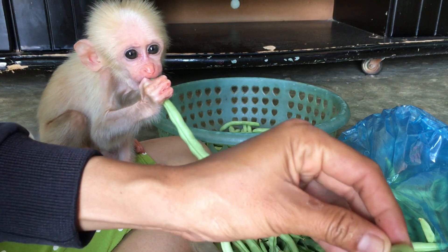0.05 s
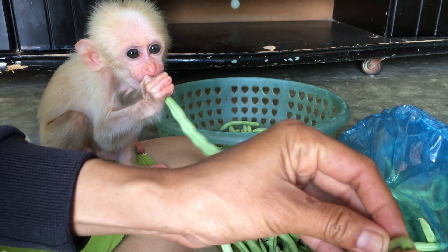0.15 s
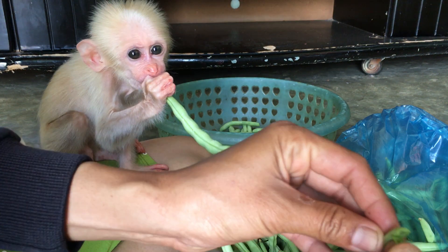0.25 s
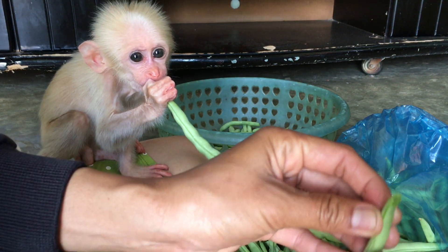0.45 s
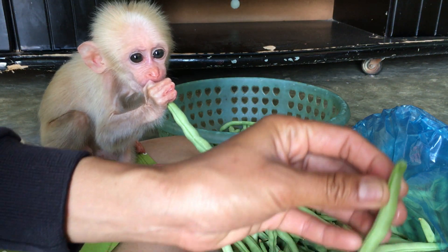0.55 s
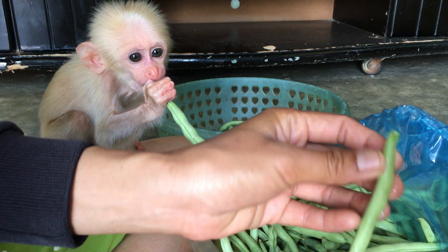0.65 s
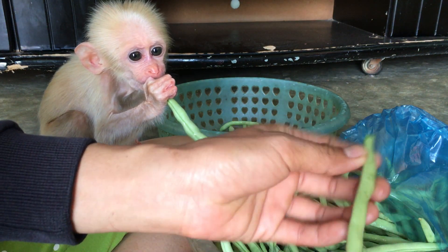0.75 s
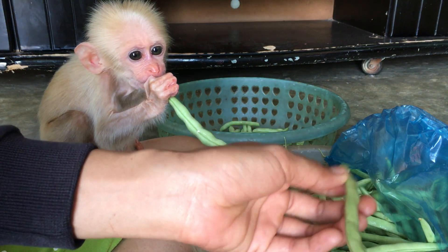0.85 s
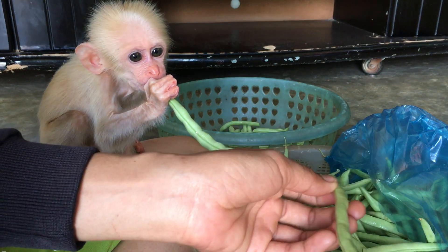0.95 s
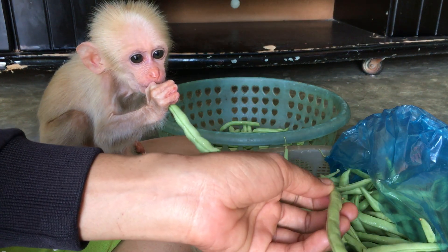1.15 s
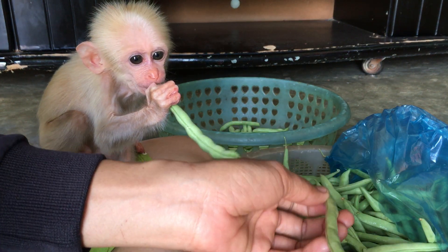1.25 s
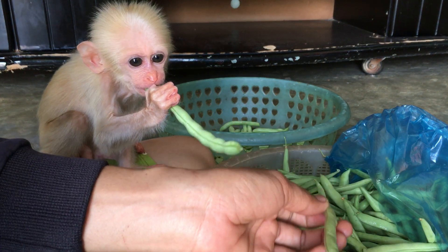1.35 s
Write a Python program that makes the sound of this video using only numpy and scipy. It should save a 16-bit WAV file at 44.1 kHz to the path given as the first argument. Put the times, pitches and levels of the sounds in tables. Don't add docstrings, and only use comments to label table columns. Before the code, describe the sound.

A green bean snaps once at about 0.22 seconds, very loud, dry and bright, close to the microphone. Before it, quiet room air, a faint low motor drone and tiny fibre ticks from 0.19. Sharp reflections follow at 0.25 to 0.27, and a thin room tail fades over half a second. Faint finger ticks come near 0.46, 0.78, 0.89 and 1.1, with barely audible bean and skin rustles.

```python
import sys
import numpy as np
from scipy import signal
from scipy.fft import rfft, irfft
from scipy.io import wavfile

SR = 44100
rng = np.random.default_rng(int(sys.argv[2]) if len(sys.argv) > 2 else 0)


def dump_mix(stems):
    frames = np.atleast_2d(stems).T
    limited = np.clip(frames, -1, 1)
    pcm = np.round(limited * 32767).astype(np.int16)
    wavfile.write(sys.argv[1], SR, pcm)


def ratio(d):
    e = np.asarray(d, float) / 20
    return 10 ** e


N = 61739

# f/Hz, density/dB per Hz
AIR_SPECTRUM = [(30, -9), (130, -4.5), (245, -11.5), (420, -18.5), (600, -24), (1200, -23.5), (5000, -35.5),
                (16000, -44.5)]
AIR_DB = -63
# t/s, f/Hz, level/dB
MOTOR_DRONE = [
    (0, 99.9, -70),
    (0.221, 91.9, -64),
    (0.578, 90.04, -63),
    (.66, 118.4, -64.5),
    (.95, 120, -65),
    (1.05, 124.9, -72),
    (1.201, 140.8, -64),
    (1.4, 135.5, -69),
]
DRONE_SWELL_DB, DRONE_WAVER_HZ = 2.2, 2
HUM_HZ, HUM_DB = 48, -69.5

# t/s, length/s, level/dB, centre f/Hz,
# width/octaves
RUSTLES = [(0.024, 0.061, -71.5, 1130, .2), (0.067, .2, -70, 350, .3),
           (0.935, 0.088, -77.5, 2870, 0.83), (1.112, 0.034, -73, 1270, 1.4),
           (1.33, 0.1, -74.5, 1580, .6), (.52, 0.13, -75.5, 3000, 1.1), (0.52, 0.23, -85.5, 9080, .15),
           (.58, 0.074, -83.5, 6610, 0.3), (1.29, 0.19, -72, 260, 0.17), (1.182, 0.095, -68, 99, 0.22),
           (0.97, 0.042, -70.5, 238, 0.28), (1.243, 0.002, -74, 5500, 1.43),
           (.86, 0.0094, -79, 11800, .6),
           (.5, .04, -78, 12500, .3),
    (.6, .04, -81, 11500, .5),
    (.41, .04, -84, 14000, .3),
    (.8, .06, -86, 12500, .4),
    (.925, .015, -81, 12500, .5),
    (.51, .02, -67, 150, .1),
]

# t/s, level/dB, low f/Hz, high f/Hz, length/s
TICKS = [(0.1935, -46, 2950, 14000, 0.00018), (.2053, -51, 2520, 14100, .00015),
         (0.2114, -50, 5070, 15500, 0.00044), (0.2138, -51, 4000, 14800, .0008),
         (.2248, -24.5, 4040, 10100, 0.00038), (0.2528, -26, 2870, 7800, 0.00021),
         (.2530, -32, 9800, 14700, 0.00052), (.2668, -30, 8000, 13900, 0.00044),
         (0.457, -49, 5500, 9500, .0006), (0.477, -58.5, 8500, 9500, 0.0066),
         (0.556, -59, 4950, 14100, 0.0076), (0.7174, -61, 12500, 15760, 0.0016),
         (0.7744, -57.5, 1504, 2080, .001), (.7751, -51.5, 3180, 6500, 0.00063),
         (.7752, -59, 7070, 13060, 0.0012), (0.878, -58, 7930, 13000, 0.0018),
         (.889, -53.5, 2540, 3600, 0.0017), (0.8893, -55, 5000, 15800, 0.0011),
         (.9675, -65.5, 11500, 15000, 0.0011), (1.0565, -64, 9100, 13950, 0.00098),
         (1.0947, -48, 1000, 3800, 0.0017), (1.0953, -54.5, 6000, 15900, .0015),
         (1.099, -61, 1490, 15000, .003),
         (.2669, -37, 1700, 3900, .0003),
    (.2669, -48, 500, 1700, .0005),
    (.7751, -59, 3300, 4300, .0008),
]

# f/Hz, density/dB per Hz
SCATTER_SPECTRUM = [(240, -47), (400, -21), (1220, -15), (2180, -8.5), (2800, -30.5), (3070, -7),
                    (8630, -6), (16000, -20)]
# f/Hz, density/dB per Hz
ROOM_SPECTRUM = [(250, -9.5), (700, -13.5), (1500, -9.5), (3300, -4.5), (5500, -6), (9300, -7),
                 (11000, -10.5), (16000, -8)]
# f/Hz, t60/s
ROOM_DECAY = [(700, 0.85), (2000, .5), (3500, 0.67), (6000, 0.61), (9000, 0.66), (15000, 0.28)]
HANDS_DB, HANDS_T60_S, HANDS_ONSET_S = -13.5, 0.0062, 0.0012
FLOOR_DB, FLOOR_T60_S, FLOOR_ONSET_S = -36, 0.076, 0.0052
ROOM_DB, ROOM_ONSET_S = -43.5, 0.02

# f/Hz, level/dB, t60/s
POD_MODES = [(3040, -53, 0.0223), (3706, -11.5, .001), (4800, -5, 0.0005), (5900, -4, 0.0014),
             (6500, -12.5, 0.0018), (7800, -10.5, .001), (9580, -2.5, .002), (11500, -1, .0008),
             (14500, 0, 0.00043)]
# f/Hz, level/dB, t60/s
FINGER_MODES = [(229, -39.5, 0.027), (355, -33, 0.014), (1240, -21, 0.0048), (2070, -17, .003)]
SNAP_S, SNAP_DB = 0.21692, -6
STRAIN_HZ, STRAIN_DB, STRAIN_START_S, STRAIN_RISE_DB_PER_S = 3100, -49, 0.2062, 1500
RADIATE_HZ = 2470
CRACK_NOTCH_HZ, CRACK_NOTCH_Q = 2700, 6

OVERLOAD = 1.1
MIC_DIP_HZ, MIC_DIP_WIDTH_HZ, MIC_DIP_DB = 10700, 350, -4
CUTOFF_HZ, CUTOFF_HZ_PER_DB = 15800, 22


def rms_one(x):
    return x / np.sqrt(np.mean(x ** 2) + 1e-20)


def at_hz(points, hz):
    table = np.array(points)
    return np.interp(np.log(hz), np.log(table[:, 0]), table[:, 1])


def drift(rate_hz):
    r = np.exp(-80 * np.pi * rate_hz / SR)
    white = rng.standard_normal(N // 40 + 2002)
    slow = signal.lfilter([1], [1, -2 * r, r * r], white)[2000:]
    return np.interp(np.arange(N) / 40, np.arange(len(slow)), rms_one(slow))


def band(x, low_hz, high_hz):
    sos = signal.butter(2, [low_hz, min(high_hz, .45 * SR)], "band", fs=SR, output="sos")
    return signal.sosfilt(sos, x)


def coloured(spectrum, shape):
    edges_hz = 22 * 2 ** np.arange(0, 9.7, 1 / 3)
    white = rng.standard_normal((2, N + 8192))
    out = flat = 0
    for k, (low_hz, high_hz) in enumerate(zip(edges_hz, edges_hz[1:])):
        hz = np.sqrt(low_hz * high_hz)
        part = ratio(at_hz(spectrum, hz)) * band(white[k % 2], low_hz, high_hz)[8192:]
        out = out + part * shape(hz)
        flat = flat + part
    return out / np.sqrt(np.mean(flat ** 2))


def dying(t60_s, onset_s):
    t = np.maximum(np.arange(N) / SR - SNAP_S, 0)
    return (1 - np.exp(-(t / onset_s) ** 2)) * ratio(-60 * t / t60_s)


def background():
    t = np.arange(N) / SR
    knot_s, knot_hz, knot_db = np.transpose(MOTOR_DRONE)
    drone_db = np.interp(t, knot_s, knot_db) + DRONE_SWELL_DB * drift(12)
    drone_hz = np.interp(t, knot_s, knot_hz) + DRONE_WAVER_HZ * drift(16)
    drone = ratio(drone_db) * np.sqrt(2) * np.sin(2 * np.pi * np.cumsum(drone_hz) / SR)
    hum = ratio(HUM_DB + 2.5 * drift(5.5)) * np.sqrt(2) * np.sin(2 * np.pi * HUM_HZ * t)
    air = ratio(AIR_DB) * coloured(AIR_SPECTRUM, lambda hz: ratio(0.4 * drift(8)))
    return air + drone + hum


def rustles():
    t = np.arange(N) / SR
    out = np.zeros(N)
    for start_s, length_s, db, hz, octaves in RUSTLES:
        grain = ratio(db + 2.4 * drift(59))
        swell = np.exp(-.5 * ((t - start_s) / length_s) ** 2)
        noise = band(rng.standard_normal(N), hz * 2 ** (-octaves / 2), hz * 2 ** (octaves / 2))
        out += grain * swell * rms_one(noise)
    return out


def ticks():
    out = np.zeros(N + 2048)
    t = np.arange(2048) / SR
    noises = rng.standard_normal((30, 2048))
    for (start_s, db, low_hz, high_hz, length_s), white in zip(TICKS, noises):
        burst = (white + 2.2 * (t == 0)) * np.exp(-t / length_s)
        tick = band(burst, low_hz, high_hz)
        i = int(start_s * SR)
        out[i:i + 2048] += ratio(db) * tick / np.max(np.abs(tick))
    return out[:N]


def echoes():
    def near_shape(hz):
        hands = ratio(HANDS_DB) * dying(HANDS_T60_S, HANDS_ONSET_S)
        return hands + ratio(FLOOR_DB) * dying(FLOOR_T60_S, FLOOR_ONSET_S)

    def room_shape(hz):
        return dying(at_hz(ROOM_DECAY, hz), ROOM_ONSET_S)

    bass_loss = [(60, -60)]
    near = coloured(bass_loss + list(SCATTER_SPECTRUM), near_shape)
    room = coloured(bass_loss + list(ROOM_SPECTRUM), room_shape)
    return near + ratio(ROOM_DB) * room


def ring(modes, after_s):
    return sum(ratio(db - 60 * after_s / t60_s) * np.sin(2 * np.pi * hz * after_s)
               for hz, db, t60_s in modes)


def snap():
    t = np.arange(N) / SR - SNAP_S
    after_s = np.clip(t, 0, .5)
    straining = (t > STRAIN_START_S - SNAP_S) * (t < 0)
    strain_level = ratio(STRAIN_DB + STRAIN_RISE_DB_PER_S * np.minimum(t, 0))
    strain = strain_level * straining * np.sin(2 * np.pi * STRAIN_HZ * t)
    radiation = signal.butter(3, RADIATE_HZ, "high", fs=SR, output="sos")
    pod = signal.sosfilt(radiation, ring(POD_MODES, after_s))
    crack = pod - ring(FINGER_MODES, after_s)
    notch_b, notch_a = signal.iirnotch(CRACK_NOTCH_HZ, CRACK_NOTCH_Q, SR)
    return ratio(SNAP_DB) * signal.lfilter(notch_b, notch_a, crack) + strain


def scene():
    return (snap() + echoes() + ticks() + rustles() + background())[None]


def band_limit(x):
    return signal.sosfilt(signal.butter(12, 17020, fs=SR, output="sos"), x)


def record(dry):
    hz = np.fft.rfftfreq(N, 1 / SR)
    dip_db = MIC_DIP_DB / (1 + ((hz - MIC_DIP_HZ) / MIC_DIP_WIDTH_HZ) ** 2)
    top_cut_db = np.maximum(hz - CUTOFF_HZ, 0) / CUTOFF_HZ_PER_DB
    rounded = OVERLOAD * np.tanh(dry / OVERLOAD)
    mix = irfft(rfft(rounded) * ratio(dip_db - top_cut_db), N)
    return band_limit(mix)


dry = scene()
out = record(dry)
dump_mix(out)
```